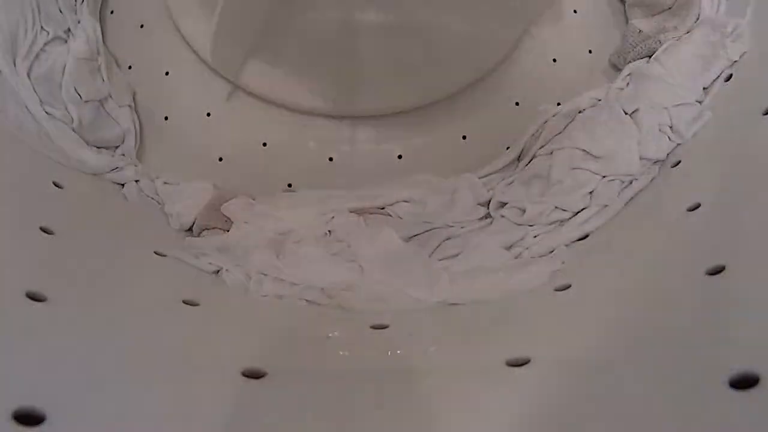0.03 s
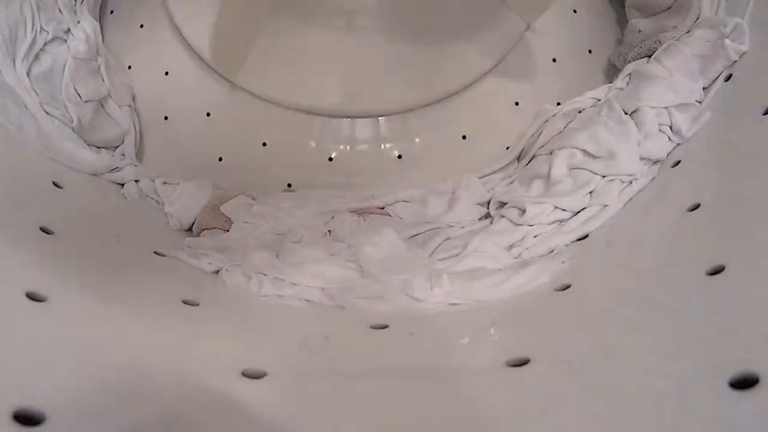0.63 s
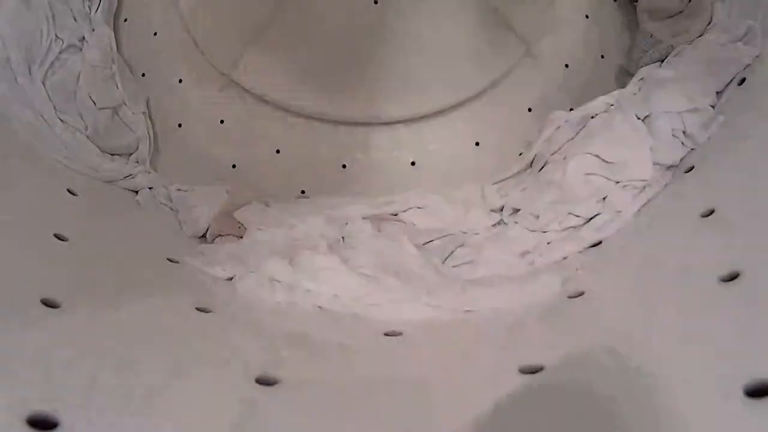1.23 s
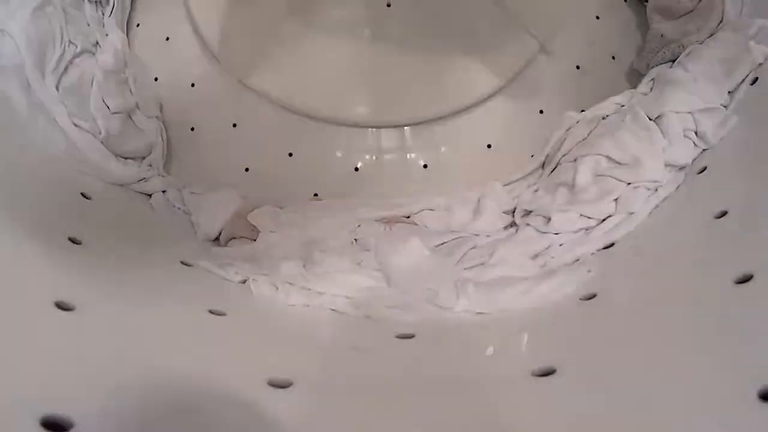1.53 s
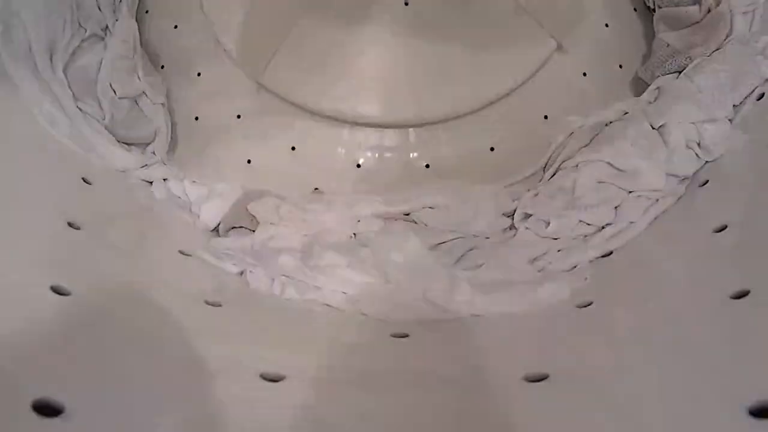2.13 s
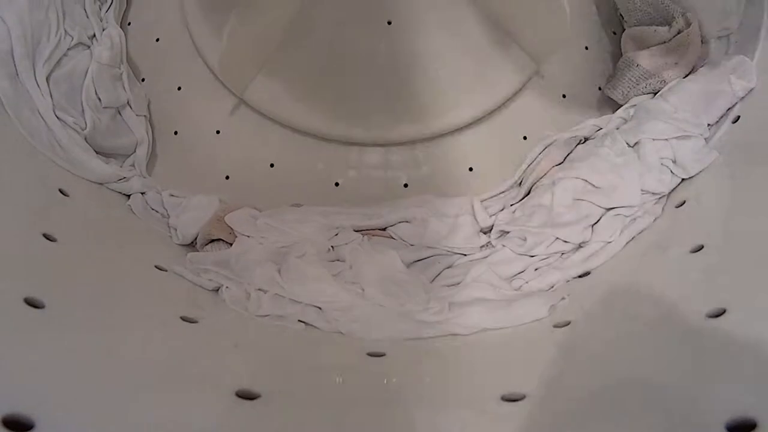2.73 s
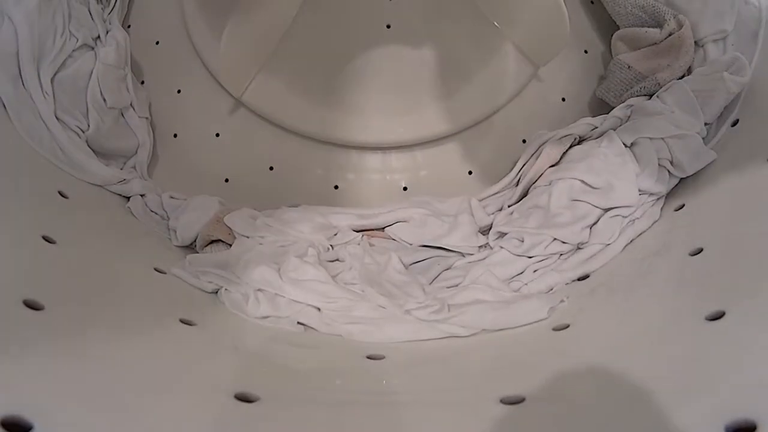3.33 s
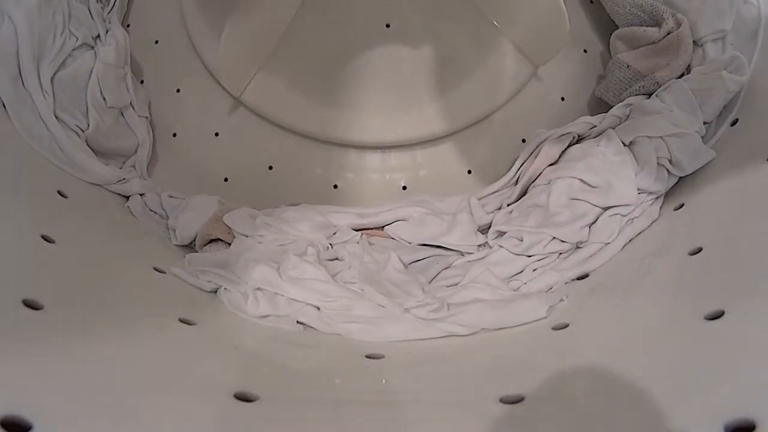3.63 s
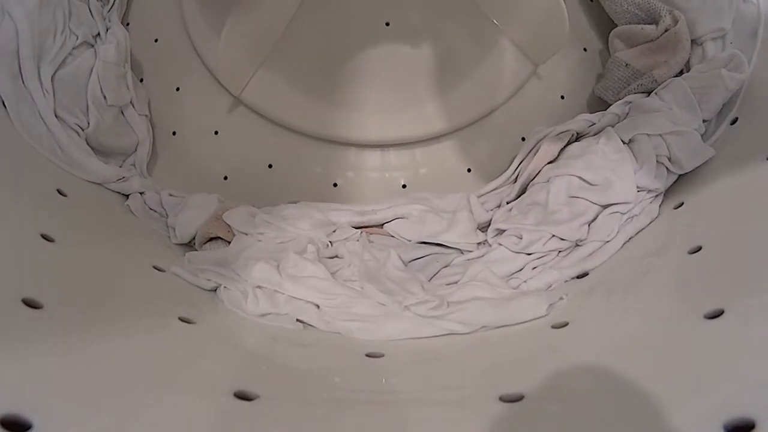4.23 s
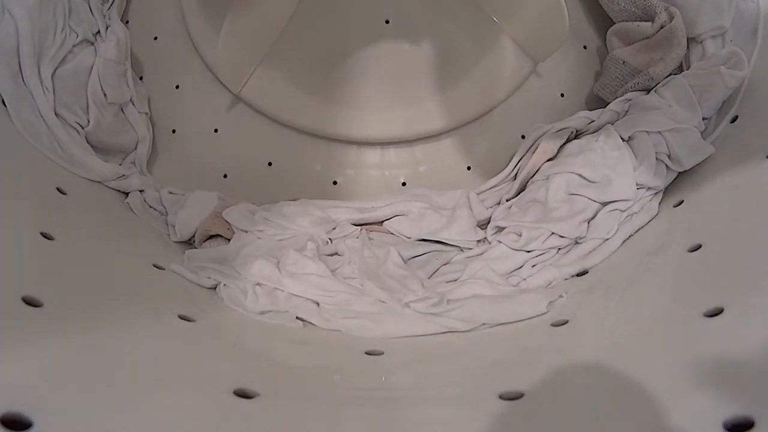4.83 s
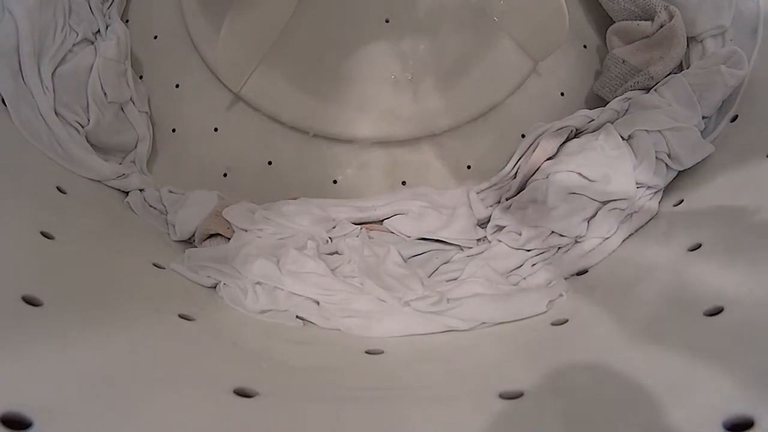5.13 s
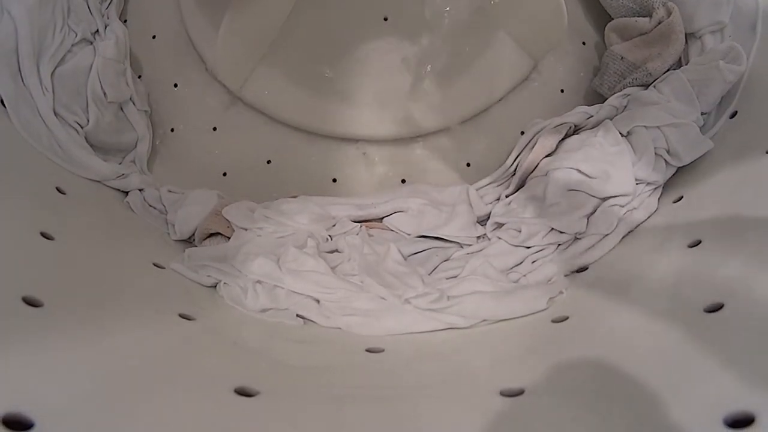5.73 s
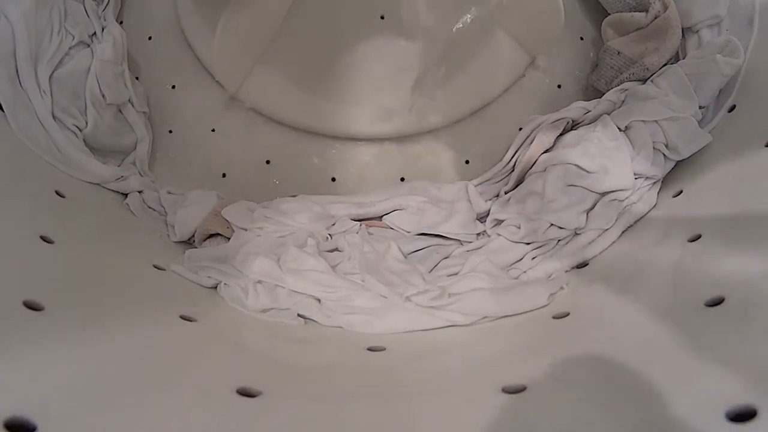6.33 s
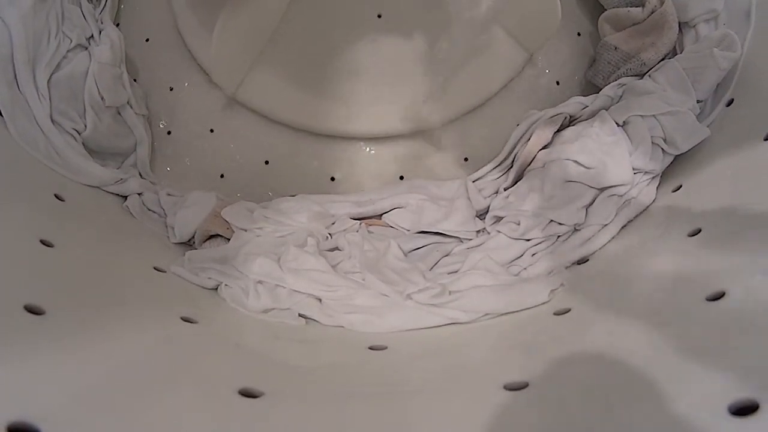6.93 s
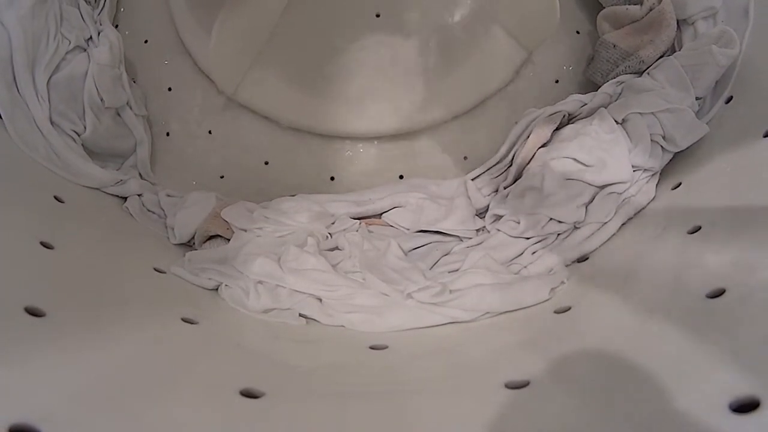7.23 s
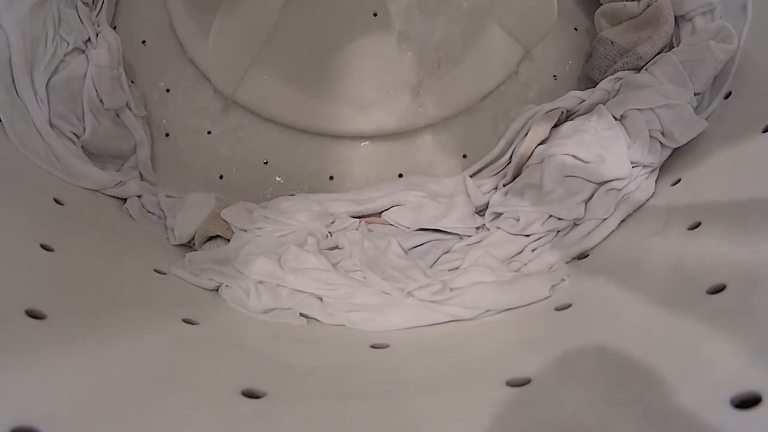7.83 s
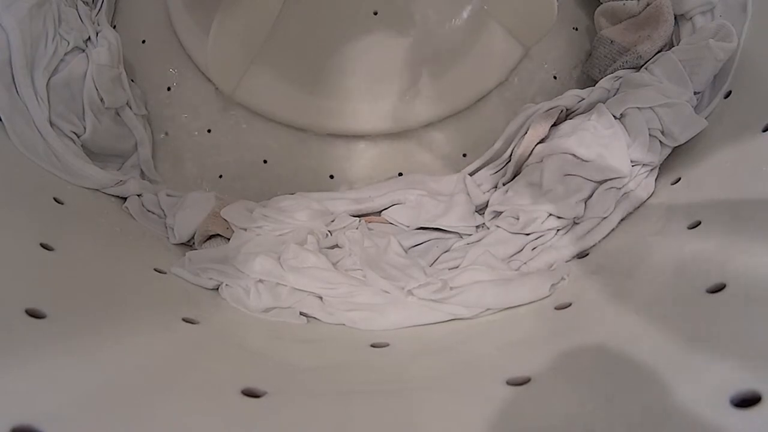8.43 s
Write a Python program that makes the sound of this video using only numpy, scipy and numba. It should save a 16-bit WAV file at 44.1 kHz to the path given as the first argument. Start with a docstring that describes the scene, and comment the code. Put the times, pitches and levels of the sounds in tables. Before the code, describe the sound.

A washer hums, winds down with knocks and a slosh, pauses, then sprays spluttering water onto steel and wet laundry.

```python
"""A laundry room, just above the open steel tub of a top-loading washer at the end of its spin.
The motor cuts out and the brake rubs, driving resonances by friction. The drum knocks as it slows,
water falls from its wall in a slosh of ringing bubbles, and the drum stops with a thump.
After a pause the inlet valve clicks and hisses; then the impacts of a spray excite the modes of
the steel and drum dully on the wet laundry."""
import sys
import numpy as np
from scipy import signal
from scipy.fft import rfft, irfft, next_fast_len
from scipy.io import wavfile
from scipy.ndimage import uniform_filter1d
from numba import njit

SR = 44100
rng = np.random.default_rng(int(sys.argv[2]) if len(sys.argv) > 2 else 0)


def bounce(signal):
    """Save signal as a 16-bit WAV file at the path given by the first command-line argument."""
    frames = np.transpose(np.atleast_2d(signal))
    limited = np.clip(frames, -1, 1)
    pcm = np.round(limited * 32767).astype(np.int16)
    wavfile.write(sys.argv[1], SR, pcm)


N = 373527
T = np.arange(N) / SR
MOTOR_OFF_S, BRAKE_S, SLOSH_S, STOP_S, VALVE_S, SPRAY_S = 0.773, 0.815, 2.19, 2.99, 4.64, 5.104


def undb(db):
    """Decibels to amplitude ratio."""
    return 10 ** (np.asarray(db) / 20)


def unit(x):
    """Normalisation to rms 1."""
    return x / np.sqrt(np.mean(x ** 2))


def curve(table):
    """Linear interpolation of (time, value) rows."""
    return np.interp(T, *np.transpose(table))


def ramp(at, length):
    """A linear rise from 0 to 1; start and length in seconds."""
    return np.clip((T - at) / length, 0, 1)


def swell(db, full_s, end_s, rise, fall):
    """Exponential growth, hold and decay as a gain; rise and fall in dB per second."""
    return undb(db - rise * np.maximum(full_s - T, 0) - fall * np.maximum(T - end_s, 0))


def noise():
    """Gaussian white noise."""
    return rng.standard_normal(N)


def walk(rate):
    """Smooth random modulation of rms 1, with about rate new values a second."""
    step = max(int(SR / rate), 1)
    return unit(uniform_filter1d(np.repeat(noise()[:N // step + 1], step), step)[:N])


def on_log(points, hz):
    """Interpolation of a spectrum along a logarithmic frequency axis."""
    known_hz, values = np.transpose(points)
    return np.interp(np.log(hz + 1), np.log(known_hz), values)


def colour(x, points, size=8192):
    """Minimum-phase filtering to a given spectrum, by folding the cepstrum; rms 1."""
    cepstrum = irfft(np.log(undb(on_log(points, np.fft.rfftfreq(size, 1 / SR)))))
    cepstrum[1:size // 2] *= 2
    cepstrum[size // 2 + 1:] = 0
    return unit(signal.oaconvolve(x, irfft(np.exp(rfft(cepstrum))))[:N])


def passband(x, order, hz, kind):
    """A maximally flat low-pass, high-pass or band-pass filter."""
    return signal.sosfilt(signal.butter(order, hz, kind, fs=SR, output="sos"), x)


def ring(x, modes):
    """Modal superposition: parallel resonators, each with a frequency, bandwidth and gain."""
    return sum(undb(db) * signal.lfilter(*signal.iirpeak(hz, max(hz / width, .6), SR), x)
               for hz, width, db in modes)


def rub(hz, width, steady):
    """Friction-driven resonance: a steady tone plus narrowband noise, both following hz."""
    phase = 2 * np.pi * np.cumsum(hz * np.ones(N)) / SR
    return unit((steady + walk(width)) * np.cos(phase) + walk(width) * np.sin(phase))


def impacts(rate, spread_db):
    """Shot noise: rate random impulses a second, a few much larger than the rest."""
    impulses = (rng.random(N) < rate / SR) * np.sign(noise())
    return impulses * undb(spread_db * np.minimum(rng.exponential(size=N), 4))


@njit
def ring_bubbles(starts, hz, cycles, sizes, glide):
    """Each bubble is a damped oscillator whose pitch rises by the fraction glide."""
    out = np.zeros(N)
    for k in range(len(starts)):
        length, phase = int(cycles * SR / hz[k]), 0.
        for i in range(min(length, N - starts[k])):
            phase += 2 * np.pi * hz[k] * (1 + glide * i / length) / SR
            out[starts[k] + i] += sizes[k] * np.exp(-5 * i / length) * np.sin(phase)
    return out


def bubbles(rate, low_hz, high_hz, cycles, spread_db, glide):
    """A cloud of bubbles of mixed sizes, with resonances spread evenly in log frequency; rms 1."""
    sizes = impacts(rate, spread_db)
    starts = np.flatnonzero(sizes)
    hz = low_hz * (high_hz / low_hz) ** rng.random(N)[starts]
    return unit(ring_bubbles(starts, hz, float(cycles), sizes[starts], float(glide)))


def burst(t60, rise, size=12000):
    """Contact noise that builds up, then decays by 60 dB in t60 seconds."""
    t = T[:size]
    return rng.standard_normal(size) * undb(-60 * t / max(t60, .002)) * (1 - np.exp(-t / rise))


def add(out, at, db, sound):
    """Superposition of one event at its peak level."""
    start = max(int(at * SR), 0)
    out[start:start + len(sound)] += (undb(db) * sound / np.abs(sound).max())[:N - start]


def blows(table, rise, rattle_db, tail, band_hz, size=9000, order=4):
    """Each impact excites one damped mode, plus contact noise lasting tail times as long."""
    out, t = np.zeros(N), T[:size]
    for at, db, hz, t60 in table:
        tone = np.sin(2 * np.pi * hz * t) * undb(-60 * t / t60) * (1 - np.exp(-t / rise)) ** 2
        rattle = passband(burst(tail * t60, rise, size), order, band_hz, "band")
        add(out, at, db, tone / np.abs(tone).max() + undb(rattle_db) * rattle / np.abs(rattle).max())
    return out


# Left against right. Each row: frequency in Hz, phase lead in radians before scaling by lead.
PHASE_LEAD = [(50, 0.29), (120, 0.53), (260, 1.68), (1400, 1.68), (2500, 1.57), (3500, 1.58), (5000, 1.12)]
# Stereo balance. Each row: frequency in Hz, left minus right in dB.
BALANCE = [(110, 0), (190, -2), (600, 2), (1100, 4), (1900, 6.5), (3500, 0), (6000, 0), (9000, -2)]
# The tub's echo. Each row: frequency in Hz, level in dB relative to wet_db.
TUB_ECHO = [(110, -12), (220, 3), (450, 4.5), (700, -2.5), (1500, -2), (2000, 3), (3200, 7)]
def tub_space(x, lead, wet_db, t60):
    """Phase and level differences place a source; reflections from the tub add a short echo."""
    size = next_fast_len(N + SR // 2)
    hz = np.fft.rfftfreq(size, 1 / SR)
    sides = np.array([[1], [-1]])
    half_phase = np.clip(lead * on_log(PHASE_LEAD, hz) / 2, -1, 1)
    t = T[:SR // 3]
    echo = rng.standard_normal((2, len(t))) * undb(-60 * t / t60) * (t > .002)
    echo = rfft(echo / np.sqrt(np.sum(echo ** 2, axis=1, keepdims=True)), size)
    wet = undb(wet_db + on_log(TUB_ECHO, hz))
    response = (np.exp(1j * sides * half_phase) + wet * echo) / np.hypot(1, wet) / np.cos(half_phase)
    balance = undb(sides * on_log(BALANCE, hz) / 2)
    return irfft(rfft(x, size) * response * balance, size)[:, :N]


def walls(x, t60, dull_hz):
    """Diffuse reverberation: the room adds a dull exponential tail, independent on each side."""
    tail = rng.standard_normal((2, SR)) * undb(-60 * T[:SR] / t60) * (T[:SR] > .012)
    tail /= np.sqrt(np.sum(tail ** 2, axis=1, keepdims=True))
    return signal.oaconvolve(passband(x, 1, dull_hz, "low")[None], tail, axes=1)[:, :N]


# The quiet room. Each row: frequency in Hz, relative spectral density in dB.
ROOM_SPECTRUM = [(25, -15), (80, 2.5), (190, 2.5), (450, -2), (685, 3), (830, 0), (1140, -6), (1350, 3),
                 (1750, -2), (2300, -7), (7900, -10.5), (11000, -14)]
def room_tone():
    """Ambient noise floor: faint broadband noise whose level drifts slightly."""
    ambience = colour(noise(), ROOM_SPECTRUM) * undb(-55.5 + .5 * walk(0.12))
    return tub_space(ambience, lead=1.0, wet_db=-17, t60=0.14)


# Flow in the hose. Each row: frequency in Hz, relative spectral density in dB.
HOSE_SPECTRUM = [(35, -41), (60, -23), (108, -3.5), (171, -6), (383, -7), (476, -14), (592, -0.5),
                 (660, -16), (999, -30), (1070, -16.5), (1580, -2), (2100, -9), (2610, -24), (3170, -18),
                 (11000, -49)]
# Strikes of the valve armature. Each row: start in seconds, peak level in dB.
ARMATURE_CLICKS = [(4.632, -27), (4.647, -34)]
# The valve body. Each row: frequency in Hz, bandwidth in Hz, gain in dB.
VALVE_BODY_MODES = [(1530, 87, 8.5), (2800, 160, 1), (4360, 250, -10)]
def valve():
    """Impact and flow noise: the valve snaps open, the hose hisses and air leaves the nozzle."""
    hose = colour(noise(), HOSE_SPECTRUM) * undb(-48 + 2.2 * ramp(5.46, 0.26)) * ramp(VALVE_S, 0.0068)
    air = rub(5300, 900, steady=0) * swell(-69, 4.88, 4.88, rise=105, fall=40)
    out = hose + air
    for at, db in ARMATURE_CLICKS:
        add(out, at, db, ring(burst(0.1, rise=0.001), VALVE_BODY_MODES))
    return out


# Slugs of water. Each row: start in seconds, peak of the drum's ring in dB, peak of the splat in dB.
JET_SLUGS = [(5.103, -17, -54), (5.129, -22, -46), (5.148, -24, -31), (5.251, -21.5, -22),
             (5.297, -16.5, -15), (5.367, -22.5, -25), (5.936, -23, -22), (6.054, -23, -15),
             (6.067, -12, -25), (6.285, -36, -17), (6.393, -27, -43), (6.431, -20.5, -19),
             (6.557, -28, -18.5), (6.632, -15, -46), (6.899, -19, -32), (7.19, -29, -26),
             (7.238, -25.5, -17), (7.605, -20, -38), (7.699, -21, -16.5), (7.9, -21.5, -43),
             (7.94, -36, -18)]
# The steel drum under drops. Each row: frequency in Hz, bandwidth in Hz, gain in dB.
STEEL_MODES = [(587, 43, -4), (1200, 110, -6.5), (1401, 48, 11.5), (1656, 100, 1), (4460, 81, -14)]
# A bursting slug. Each row: frequency in Hz, relative spectral density in dB.
SPLAT_SPECTRUM = [(300, -27.5), (2000, -20), (3100, 9.5), (3800, -14), (5000, 17.5), (6000, -9), (9500, -2),
                  (11200, -16)]
def slugs():
    """Impulsive excitation: each fat slug from the jet rings the drum and bursts in a bright splat."""
    out = np.zeros(N)
    for at, ring_db, splat_db in JET_SLUGS:
        add(out, at, ring_db, ring(burst(0.012, rise=0.000058), STEEL_MODES))
        add(out, at, splat_db, colour(burst(0.0091, rise=0.00063), SPLAT_SPECTRUM))
    return out


# Drops on steel and on wet cloth. Each row: frequency in Hz, relative spectral density in dB.
PATTER_SPECTRUM = [(300, -18), (650, 10), (920, -9), (1250, 11.5), (1800, 5.5), (2400, -20.5), (3000, 2.5),
                   (3800, -7), (4650, 3.5), (5050, 8), (5900, -5.5), (8400, -5.5), (10000, -8.5),
                   (11200, -25.5)]
CLOTH_SPECTRUM = [(20, -27), (55, -32), (85, -9.5), (115, -6.5), (155, 5), (215, -4.5), (280, -1.5),
                  (360, -11.5), (420, -7), (490, -9), (560, -10.5), (900, -19.5), (2000, -39)]
def spray():
    """Modulated shot noise: a spluttering jet ticks on steel, splats in puddles and drums on cloth."""
    # clumps of drops land together and scatter within a few hundredths of a second
    clumps = signal.lfilter([1], [1, -np.exp(-1 / (.009 * SR))], impacts(90, 1.2) ** 2)
    splutter = np.sqrt(.7 + clumps / clumps.mean()) * undb(1.5 * walk(100) + .7 * walk(14))

    def patter():
        drops = impacts(7000, 2.34) + 0.49 * noise()
        return colour(drops * splutter * undb(4.54 * walk(300)), PATTER_SPECTRUM)

    # the jet lands in two patches, one towards each side; only fine drops reach the far one
    near, far = patter(), passband(patter(), 2, 2500, "high")
    steel = undb(-3) * unit(ring(impacts(700, 2.0) * splutter, STEEL_MODES))
    puddles = unit(bubbles(220, 1150, 2900, cycles=14, spread_db=2.2, glide=.05) * splutter)
    # a brief first gush, then a weaker flow that builds to full pressure
    gush_db = 7 * (1 - ramp(SPRAY_S, 0.044))
    weak_db = 8 * (1 - ramp(SPRAY_S, 0.76))
    flow = undb(-30.5 - weak_db + gush_db) * ramp(SPRAY_S, 0.0013)
    cloth = colour(impacts(500, 0.87), CLOTH_SPECTRUM)
    cloth *= undb(-33 - .5 * weak_db + gush_db) * ramp(SPRAY_S, 0.0042)
    near_patch = (undb(-6) * (near + steel) + undb(-12.5) * puddles) * flow + cloth + slugs()
    return (tub_space(near_patch, lead=0.84, wet_db=-8, t60=0.05)
            + tub_space(undb(-9) * far * flow, lead=-0.68, wet_db=-8.5, t60=0.0089))


# Single splashes and drips. Each row: start in seconds, peak level in dB, pitch in Hz.
LOUD_SPLASHES = [(2.1206, -18, 1850), (2.357, -16, 1640), (2.39, -12, 1544), (2.419, -14, 1700),
                 (2.455, -11, 1330), (3.193, -25, 1280), (3.235, -16.5, 1580), (3.5534, -35, 1430),
                 (3.962, -42, 1500), (4.117, -44, 1500), (4.708, -34, 3080), (5.797, -24.5, 2000),
                 (5.935, -17.5, 2480), (5.97, -29, 2700), (6.224, -24, 2680), (6.796, -19.5, 3050),
                 (7.1857, -19.5, 1650), (7.554, -24.5, 1900), (7.66, -20, 1990), (7.782, -26, 2250),
                 (8.025, -25, 2020)]
def splashes(t60=0.045, q=7):
    """Cavity resonance: each splash is a ragged burst that rings a well-damped pocket of air."""
    out = np.zeros(N)
    for at, db, hz in LOUD_SPLASHES:
        pocket = ring(burst(t60, rise=0.0011), [(hz, hz / q, 0)])
        add(out, at, db, ring(pocket, [(hz, hz, 0)]))
    return out


# Churning water. Each row: frequency in Hz, relative spectral density in dB.
CHURN_SPECTRUM = [(88, -47), (150, -16), (239, -12), (375, -25), (667, 1), (842, -8.5), (1080, -5),
                  (1580, 4), (2860, -6.5), (3680, -24.5), (4730, -17.5), (5970, -30), (7820, -33),
                  (11000, -53)]
def slosh(ebb_s=2.934, collapse_s=3.123):
    """Bubble resonance: water falls back from the wall of the slowing drum, churns and subsides."""
    cloud = bubbles(3200, 499, 7180, cycles=15, spread_db=1.7, glide=0.1)
    churn = colour(cloud + undb(-8.5) * noise(), CHURN_SPECTRUM)
    # thin and bright at first, fuller as more water falls
    thin, full = (unit(passband(churn, 2, hz, "high")) for hz in (1920, 734))
    filling = ramp(2.356, 0.21)
    rush = thin * np.sqrt(1 - filling) + full * np.sqrt(filling)
    large_bubbles = bubbles(1200, 187, 883, cycles=11, spread_db=1.8, glide=0.25)
    gurgle = unit(ring(large_bubbles, [(654, 177, 9.5), (280, 87, -5.5)]))
    gurgle *= swell(-23, 2.72, ebb_s, rise=55, fall=30)
    # separate slaps merge into one rush
    slapping_db = (3.4 - 1.9 * ramp(2.4, 0.2)) * walk(150)
    rush *= undb(slapping_db) * swell(-19, 2.574, ebb_s, rise=48, fall=51)
    flung = colour(noise(), [(2000, -21.5), (4700, 10), (5900, -4), (11000, -9)])
    flung *= undb(-37 - 77 * ramp(2.193, 0.44))
    first_drops = bubbles(260, 1700, 3300, cycles=30, spread_db=1, glide=.1)
    first_drops *= swell(-29.5, 2.48, 2.48, rise=25, fall=25)
    collapse = undb(-20 * np.maximum(T - collapse_s, 0) / 0.082)
    return (rush + gurgle + flung + first_drops) * collapse * ramp(SLOSH_S, 0.028)


def trickle(end_s=3.533):
    """Sparser bubble resonances: the last water runs off the drum, then dribbles away."""
    spectrum = [(150, -36), (420, -10), (680, 0.5), (950, -18), (1500, 1), (3200, -13), (6000, -5)]
    water = colour(bubbles(500, 472, 3300, cycles=22, spread_db=3.4, glide=0.32), spectrum)
    runoff = undb(-48.5) * (1 - ramp(end_s, 0.052))
    dribble = swell(-52.5, end_s, end_s, rise=0, fall=19)
    return water * (runoff + dribble) * ramp(SLOSH_S, 0.028)


# The slowing drum. Each row: time in seconds, speed in turns per second.
DRUM_SPEED = [(0, 10.18), (.86, 10.17), (1.3, 8.55), (1.85, 6.23), (2.4, 4), (3.3, 3.1)]
def speed_share():
    """Rotation rate as a fraction of full speed."""
    speed = curve(DRUM_SPEED)
    return speed / speed[0]


# The rattling drum. Each row: frequency in Hz, bandwidth in Hz, gain in dB.
RATTLE_MODES = [(434, 84, -5.5), (730, 150, 1.5), (910, 60, -6), (1428, 200, 13)]
def clatter():
    """Random impacts excite the drum's modes: lightly as the brake drags, hard as water slaps it."""
    dragging, slapping = (unit(ring(passband(impacts(rate, 0.64), 4, 1700, "low"), RATTLE_MODES))
                          for rate in (34, 170))
    dragging *= undb(-43 - 2 * np.log2(speed_share())) * ramp(BRAKE_S, 0.054)
    slapping *= swell(-23, 2.64, 2.64, rise=90, fall=10.6)
    return (dragging + slapping) * (1 - ramp(STOP_S, 0.23))


# Impacts. Each row: start in seconds, peak level in dB, pitch in Hz, 60 dB decay in seconds.
DRUM_KNOCKS = [(.487, -9.5, 1410, .02), (1.167, -9, 1450, 0.03), (1.184, -8, 810, 0.027),
               (1.305, -10.5, 910, 0.015), (1.422, -7, 1157, 0.014), (1.561, -21.5, 650, .02),
               (1.642, -8, 1370, 0.0091), (1.706, -20, 455, 0.024), (1.874, -12, 680, 0.014),
               (2.299, -13, 1400, 0.067), (3.052, -17, 1530, 0.021), (3.215, -6.5, 722, 0.018),
               (3.301, -18.5, 605, 0.072), (3.327, -24, 702, 0.12), (3.431, -29, 563, 0.11)]
SHARP_TICKS = [(.278, -28, 5530, 0.046), (.953, -21.5, 4480, 0.024), (1.167, -25, 3020, 0.051),
               (1.397, -25, 4400, .035), (1.642, -25.5, 2940, 0.024), (3.215, -28.5, 2320, .05)]
LOW_THUMPS = [(2.298, -22.5, 43.4, 0.093), (2.99, -23.5, 29.1, 0.22), (3.300, -16.5, 44.2, 0.097),
              (3.318, -19, 85, 0.17), (3.428, -26.5, 90.4, 0.16), (8.33, -37.5, 61.6, 0.24)]  # dull thumps as the drum slows and stops; a faint handling bump at the end
BRAKE_GRABS = [(2.198, -10, 727, 0.034), (3.076, -13, 662, .03), (3.102, -7.5, 606, 0.031)]
STEEL_SNAPS = [(2.010, -8, 3500, 0.0081), (2.553, -13.5, 4620, 0.014)]
def jolts():
    """Damped free vibration: knocks, ticks, snaps, low thumps and groans where the brake grabs."""
    knocks = blows(DRUM_KNOCKS, rise=.0003, rattle_db=3, tail=1.1, band_hz=(450, 1600), order=5)
    ticks = blows(SHARP_TICKS, rise=.0001, rattle_db=12.5, tail=.41, band_hz=(2070, 4700), order=3)
    thumps = blows(LOW_THUMPS, rise=.0047, rattle_db=-5, tail=1.1, band_hz=(45, 277), size=16000)
    grabs = blows(BRAKE_GRABS, rise=.009, rattle_db=-3, tail=1.3, band_hz=(550, 1700))
    snaps = blows(STEEL_SNAPS, rise=.0001, rattle_db=9, tail=.3, band_hz=(2200, 5400), order=2)
    return knocks + ticks + snaps + thumps + grabs


# The note of the brake. Each row: time in seconds, pitch in Hz at full drum speed.
BRAKE_PITCH = [(.81, 1260), (.825, 1112), (.842, 752), (.872, 875), (.92, 874)]
def brake(release_s=2.2):
    """Friction-induced vibration: the brake bites with a squawk and a hiss, then rubs a sinking note."""
    hz = curve(BRAKE_PITCH) * speed_share() ** 0.07
    squawk = rub(hz, 150, steady=0.92) * swell(-17.5, BRAKE_S, 0.868, rise=0, fall=281)
    rubbing = rub(hz, 60, steady=0.44) * swell(-32.5, BRAKE_S, BRAKE_S, rise=0, fall=8)
    rubbing *= 1 - ramp(release_s, 0.12)
    lining = colour(noise(), [(1000, 9), (2500, 9), (5000, -5.5), (7000, -7.5), (11000, -16.5)])
    lining *= undb(-34 - 16.3 * ramp(BRAKE_S, 0.48)) * ramp(BRAKE_S, 0.028) * (1 - ramp(STOP_S, 0.37))
    return (squawk + rubbing) * ramp(BRAKE_S, 0.0024) + lining


# The motor's tones. Each row: frequency in Hz, mean level in dB.
MOTOR_TONES = [(109.8, -25), (130.6, -30.5)]
def motor_hum(beat_db=3.5, beat_s=0.3, crest_s=0.14):
    """Amplitude modulation: the hum beats slowly until the motor cuts out."""
    tones = sum(undb(db) * rub(hz, 10, steady=3.5) for hz, db in MOTOR_TONES)
    beat = undb(beat_db * np.cos(2 * np.pi * (T - crest_s) / beat_s))
    return tones * beat * (1 - ramp(MOTOR_OFF_S, 0.019))


# The whistle of the bearing. Each row: time in seconds, pitch in Hz, level in dB before the throb.
BEARING_WHISTLE = [(0, 1468, -43.5), (.045, 1460, -17.5), (.13, 1432, -35), (.21, 1492, -20.5),
                   (.27, 1422, -30), (.35, 1468, -20.5), (.45, 1448, -28.5), (.555, 1379, -22.5),
                   (.59, 1465, -21), (.66, 1423, -27), (.73, 1454, -21), (.78, 1485, -26.5),
                   (.9, 1400, -23), (.955, 1360, -27.5), (1.005, 1425, -18.5), (1.065, 1370, -28),
                   (1.26, 1310, -36), (1.9, 1200, -69)]
def bearing():
    """Friction feeds a resonance in the bearing, which wavers in pitch and level."""
    times, hz, db = np.transpose(BEARING_WHISTLE)
    pitch = np.interp(T, times, hz) * (1 + .006 * walk(70))
    return rub(pitch, 90, steady=2) * undb(np.interp(T, times, db))


# Drum rumble and gear whir. Each row: frequency in Hz, relative spectral density in dB.
RUMBLE_SPECTRUM = [(20, 2), (55, -10.5), (90, 9), (135, 6.5), (190, -0.5), (250, 2.5), (350, -4),
                   (450, -4.5), (560, -9), (700, 0), (950, -6.5), (1300, -12), (1900, -18.5), (3000, -29.5),
                   (6000, -57), (11000, -62)]
GEAR_SPECTRUM = [(500, -16.5), (900, -14), (1090, 4), (1200, -2.5), (1400, 14.5), (1700, 0.5), (1900, -13),
                 (2900, -22.5), (3700, -37.5), (11000, -78)]
def spinning_drum():
    """Rotational modulation: rumble and whir throb at multiples of the turning rate and fade with it."""
    share = speed_share()
    halvings = -np.log2(share)
    angle = 2 * np.pi * np.cumsum(curve(DRUM_SPEED)) / SR
    throb = undb(np.cos(angle) + 1.46 * np.cos(4 * angle) + 1.3 * np.cos(7 * angle))
    drive_db = 4.5 * (1 - ramp(MOTOR_OFF_S, 0.28))  # the driven drum shakes harder
    rumble = colour((noise() + 5 * impacts(250, 4.3)) * throb, RUMBLE_SPECTRUM)
    rumble *= undb(-26.5 + drive_db - 6 * halvings)
    whistle = bearing()
    gears = colour(noise() + 4 * impacts(900, 0.77), GEAR_SPECTRUM) * undb(-24 - 35 * halvings)
    whir = (whistle + gears) * throb
    drone = rub(109.7 * share, 26, steady=0.27) * undb(-29.5 - 18 * halvings)
    # the cabinet's resonance booms once the drum has slowed
    cabinet = rub(84.5, 26, steady=0.13) * undb(-38) * ramp(1.7, 0.16)
    # air and flung droplets hiss round the drum
    hiss = colour(noise(), [(1500, -5), (3600, -11), (4700, 4.5), (6000, -8.5), (11000, -14.5)])
    hiss *= undb(-53.5 - 1.7 * halvings)
    # for half a second the gears sing a sinking note and the shaft shakes the frame
    gear_note = undb(-37.5) * rub(552 * share ** .58, 20, steady=3)
    shake = undb(-37) * np.cos(4.6 * angle)
    shudder = (gear_note + shake) * ramp(1.245, 0.18) * (1 - ramp(1.745, 0.048))
    return (rumble + whir + drone + cabinet + hiss + shudder) * (1 - ramp(STOP_S, 0.5))


def scene():
    """Superposition of machine and water in the tub, their reverberation and the quiet room."""
    machine = motor_hum() + spinning_drum() + brake() + clatter() + jolts()
    water = slosh() + trickle() + splashes() + valve()
    tub = tub_space(machine, lead=0.92, wet_db=-8.5, t60=0.049)
    tub += tub_space(water, lead=0.79, wet_db=-11.5, t60=0.1)
    return room_tone() + tub + spray() + undb(-12) * walls(machine + water, t60=0.98, dull_hz=700)


def record(dry):
    """Soft saturation rounds the loudest peaks; a steep low-pass cuts the top."""
    return signal.sosfilt(signal.ellip(10, .2, 70, 11050, fs=SR, output="sos"), np.tanh(dry))


dry = scene()
out = record(dry)
bounce(out)
```